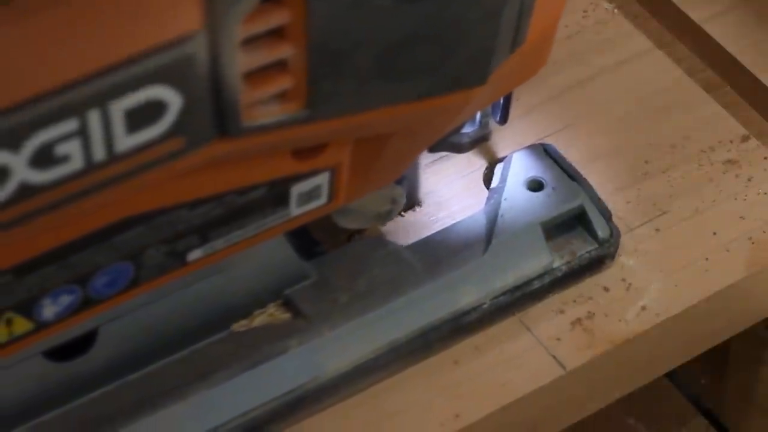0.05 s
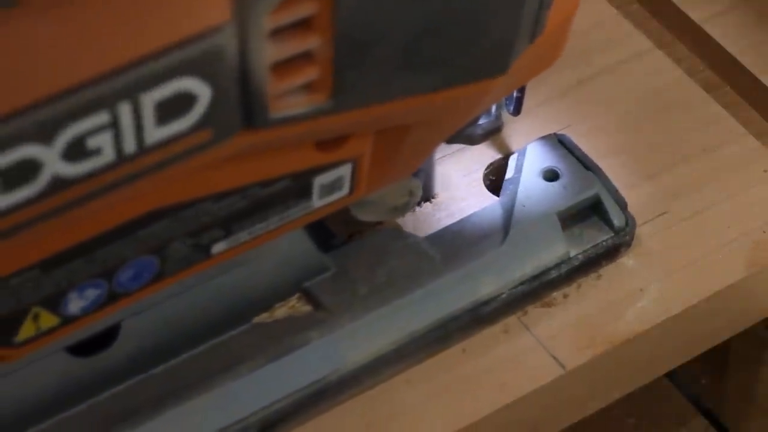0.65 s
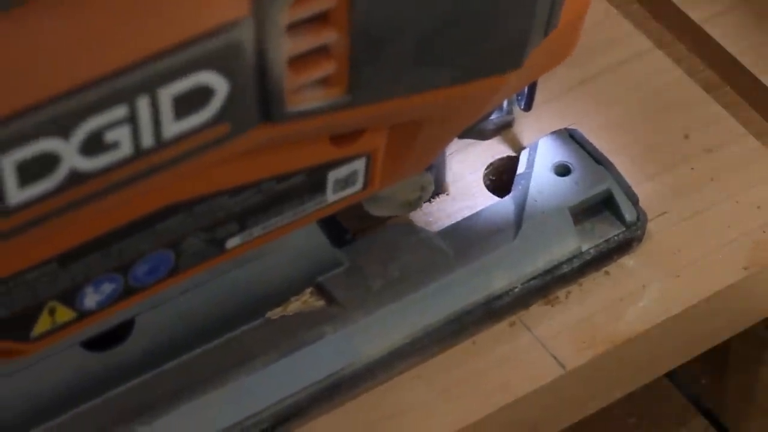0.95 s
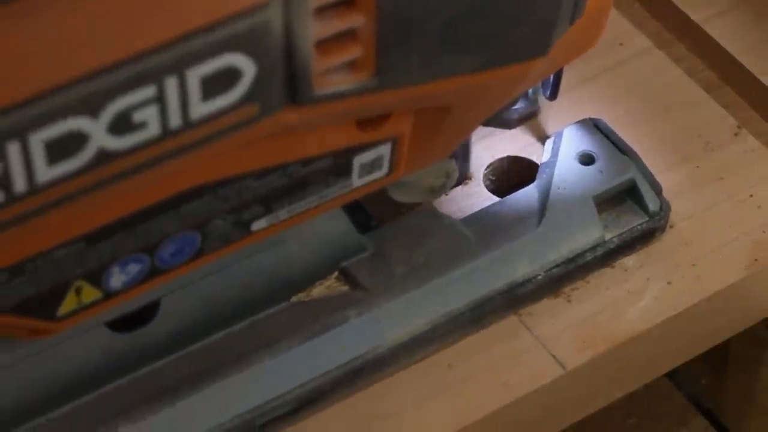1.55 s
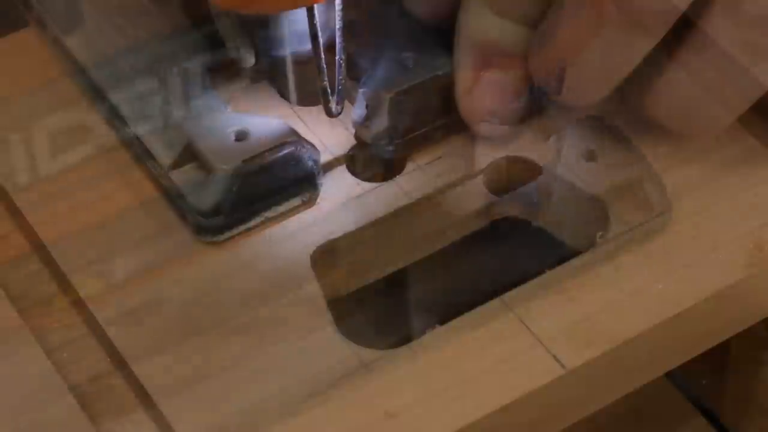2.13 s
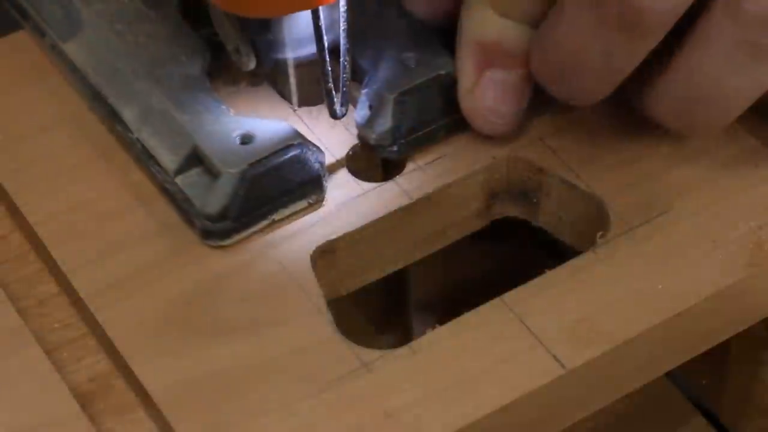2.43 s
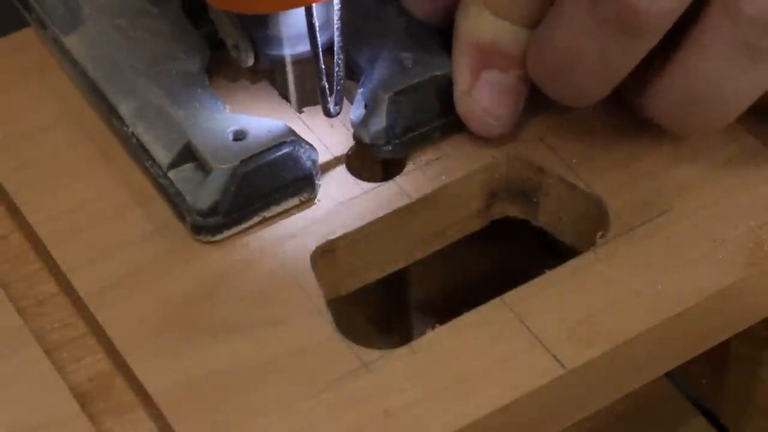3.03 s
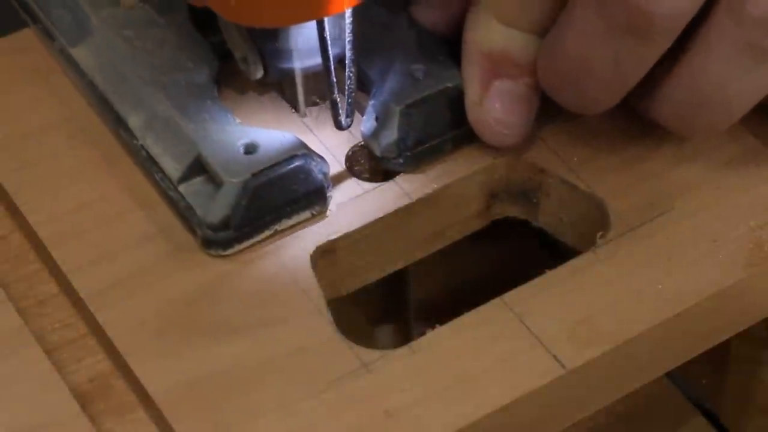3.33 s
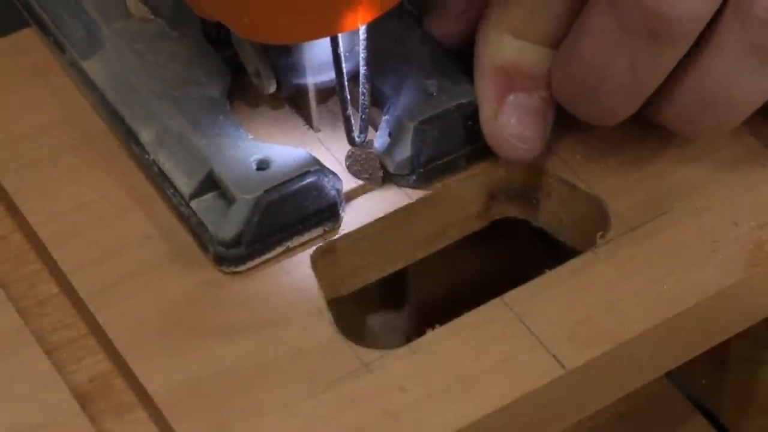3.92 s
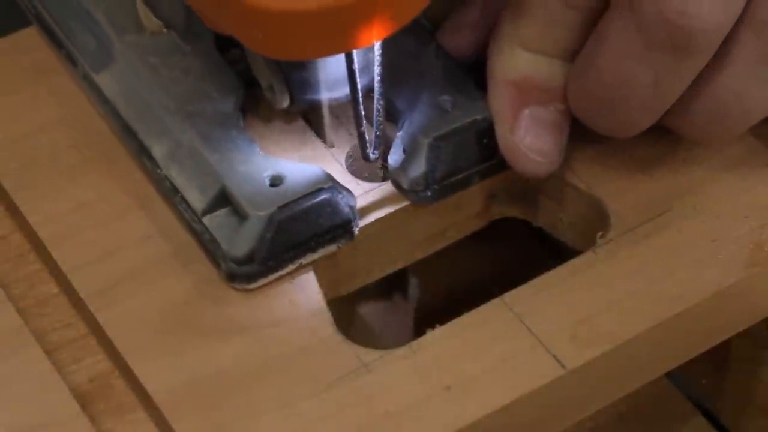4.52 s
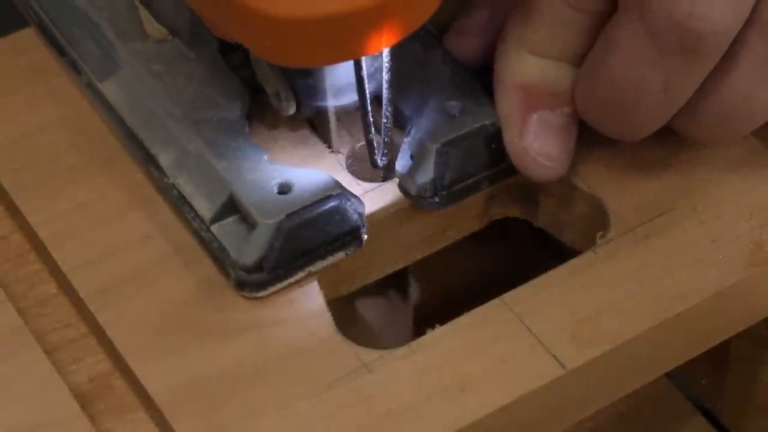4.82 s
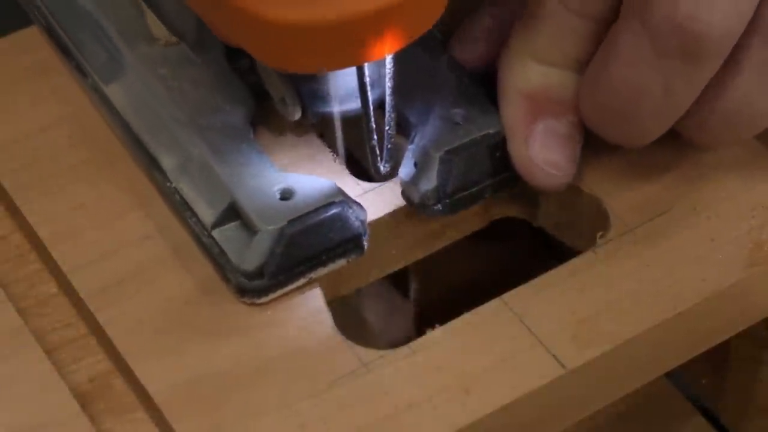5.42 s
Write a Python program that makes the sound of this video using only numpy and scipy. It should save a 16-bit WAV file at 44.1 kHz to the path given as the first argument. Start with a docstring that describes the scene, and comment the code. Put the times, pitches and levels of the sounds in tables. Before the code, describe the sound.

Close up in a workshop, a jigsaw runs without stopping, its blade rasping through a wooden board. The high motor whistle, whining gears and rapid rattle carry a hiss of air. One cut fades into another after roughly two seconds, and the pitch dips a little with each push into the wood, rising again as the pressure lets up. The saw turns slightly shriller at the end.

```python
"""At a workshop bench, close by, a corded jigsaw cuts a wooden board; one cut fades into a second near 2 s.
The motor fan whistles, the gears whine, the plunger rattles about 54 times a second
and the teeth rasp in the board. The motor sags when the blade bites and speeds up when it comes free.
A faint room rumble lies underneath."""
import sys
import numpy as np
from scipy import signal
from scipy.fft import rfft, irfft
from scipy.io import wavfile
from scipy.ndimage import uniform_filter1d

SR = 44100
rng = np.random.default_rng(int(sys.argv[2]) if len(sys.argv) > 2 else 0)


def dump_mix(stems):
    """Bounce the given channels to the path in sys.argv[1] as a 16-bit WAV at rate SR."""
    frames = np.atleast_2d(stems).T  # one column per channel
    limited = np.clip(frames, -1, 1)  # hard clip at full scale
    pcm = np.round(limited * 32767).astype(np.int16)
    wavfile.write(sys.argv[1], SR, pcm)


N = 245151
T = np.arange(N) / SR
GEAR_TEETH, PINION_TEETH, FAN_BLADES = 46, 7, 8


def undb(db):
    """Decibels to gain."""
    return 10 ** (np.asarray(db) / 20)


def unit(x):
    """Scale to rms 1."""
    return x / np.sqrt(np.mean(x ** 2))


def ramp(start, length):
    """Rises from 0 to 1 in `length` seconds."""
    return np.clip((T - start) / length, 0, 1)


def swell(start, end, edge):
    """1 from start to end, with a slope of `edge` seconds on either side."""
    return ramp(start - edge, edge) - ramp(end, edge)


def drift(rate_hz):
    """Smooth random movement up to about rate_hz, rms 1."""
    f = np.arange(N // 2 + 1) * SR / N
    return unit(irfft(rfft(rng.standard_normal(N)) / (1 + (f / rate_hz) ** 4), N))


def shape(x, gain_at):
    """Filter x with a response given as a function of frequency."""
    return irfft(rfft(x) * gain_at(np.arange(1, N // 2 + 2) * SR / N), N)


def ring(x, hz, width):
    """A resonance with steep skirts, rms 1."""
    return unit(shape(x, lambda f: (1 + 1j * (f / hz - hz / f) * hz / (1.3 * width)) ** -2))


def workshop_rumble(db=-104, corner_hz=110):
    """Faint low room tone."""
    lows = shape(rng.standard_normal(N), lambda f: np.minimum(f / 40, 1) / (1 + (f / corner_hz) ** 2))
    return undb(db) * unit(lows)


def bench_comb(f):
    """Short echoes off the bench and the things on it comb the spectrum finely."""
    # Each row: delay in ms, level in dB.
    echoes = [(3.1, -32), (5.3, -29.5), (8.9, -15)]
    return 1 + sum(undb(db) * np.exp(-2j * np.pi * f * ms / 1000) for ms, db in echoes)


def housing(f, cut):
    """The saw body colours the rattle and hiss; cut is 0 for the first, 1 for the second."""
    # The broad colour. Each row: frequency in Hz, level in dB in the first cut and in the second.
    colour = [(30, -121, -118), (100, -118, -117), (180, -110, -111), (315, -94.5, -99),
              (516, -87.5, -85.5), (1090, -81, -81), (1750, -81, -78), (2170, -85, -87), (2500, -78.5, -77),
              (3240, -79, -77.5), (4100, -84, -78.5), (5180, -81, -77), (6040, -88.5, -83),
              (7110, -81, -82), (7840, -96, -91.5), (8470, -88, -86.5), (10970, -94, -89.5),
              (12400, -99, -94), (17000, -101, -101)]
    # Resonances and hollows. Each row: centre and width in Hz, gain in dB in the first and second cut.
    bumps = [(3080, 63, 4, -3.5), (3314, 180, 1.5, 2), (4170, 440, 1.5, 2), (4566, 246, -0.5, -7),
             (4670, 42, 6, 6), (6480, 160, -2, -10)]
    hz, *colour_db = np.transpose(colour)
    bumps_db = sum(db[cut] * np.exp(-(2 * (f - centre) / width) ** 2) for centre, width, *db in bumps)
    return undb(np.interp(np.log(f), np.log(hz), colour_db[cut]) + bumps_db)


def knocks(strokes, slop_ms, scatter_db, per_stroke, memory_strokes=36, max_strokes=320):
    """Small impacts at the same places in every stroke, each a little early or late, hard or soft."""
    place = np.arange(max_strokes)[:, None] + (np.arange(per_stroke) + rng.random(per_stroke)) / per_stroke
    late, force, contact = rng.standard_normal((3, max_strokes, per_stroke))
    hit_s = np.interp(place, strokes, T, right=-1) + late * slop_ms / 1000
    at = np.rint(hit_s * SR).astype(int)
    # the pattern changes slowly as the saw creeps forward
    pattern = uniform_filter1d(contact, memory_strokes, axis=0, mode="wrap")
    size = pattern * undb(scatter_db * force)
    inside = (at > 0) & (at < N)
    return unit(np.bincount(at[inside], size[inside], N))


def rattle_and_hiss(strokes, low_hz=700, high_hz=3400):
    """Plunger knocks fill the mids; rushing air and flying dust take over in the treble."""
    def knock_share(f):
        """Part of the power that comes from the knocks."""
        return .8 / (1 + (f / high_hz) ** 2) / (1 + (low_hz / f) ** 2)
    plunger = knocks(strokes, slop_ms=.025, scatter_db=2.5, per_stroke=90)
    rattle = shape(plunger, lambda f: np.sqrt(knock_share(f)))
    puffs_db = -0.05 * np.cos(2 * np.pi * 2 * strokes) + .5 * drift(56) + 0.54 * drift(5.1)
    air = shape(rng.standard_normal(N) * undb(puffs_db), lambda f: np.sqrt(1 - knock_share(f)))
    return shape(rattle + air, bench_comb) * np.sqrt(SR / 2)  # about 0 dB per Hz


def tooth_rasp(strokes, ring_db):
    """Teeth tear the fibres, hardest on the upstroke, and set the board ringing."""
    # The board's low and high resonance. Each row: centre in Hz, width in Hz, trim in dB.
    modes = [(1213, 340, -1), (1705, 293, -0.5)]
    teeth = knocks(strokes, slop_ms=0.073, scatter_db=4.5, per_stroke=30) + .5 * rng.standard_normal(N)
    upstroke_db = -np.cos(2 * np.pi * strokes)
    teeth = teeth * undb(upstroke_db)
    return sum(ring(teeth, hz, width) * undb(db + trim) for (hz, width, trim), db in zip(modes, ring_db))


def tooth_catches():
    """The teeth catch now and then and shift the level of the board's two rings, in dB."""
    # Each row: start and end in seconds, change of the low ring and of the high ring in dB.
    catches = [(0, 0.052, -3, 6), (1.3, 1.418, -6, 1), (1.998, 2.16, 6, 5.5), (2.557, 2.75, 2, -4),
               (3.85, 3.91, 4.5, 1), (4.541, 4.731, 4, 4), (5.3, 5.4, -4, 4.5)]
    return sum(np.outer(change_db, swell(start, end, 0.027)) for start, end, *change_db in catches)


def gear_whine(strokes, bite, mesh_db, tones, waver_db=1.88):
    """Harmonics of the stroke rate; biting shakes the board and presses the gear teeth together."""
    # Single tones sing out as the pressure on the shoe shifts.
    # Each row: start and end in seconds, harmonic number, level it moves to in dB.
    singing = [(0, .46, 36, -55), (0, .46, 46, -52), (.52, .63, 16, -58), (.75, 1, 19, -60),
               (1.05, 1.3, 16, -58), (1.05, 1.45, 9, -57), (1.1, 1.45, 26, -57), (2.2, 2.5, 13, -59),
               (2.62, 2.8, 46, -48.5), (2.86, 3.15, 9, -57), (4.55, 4.74, 21, -53), (4.55, 4.74, 33, -53),
               (4.75, 5.05, 20, -53), (4.78, 5.08, 46, -45.5), (5.2, 5.5, 9, -59), (5.2, 5.48, 22, -53)]
    whine = 0
    for multiple, biting_db, free_db in tones:
        harmonic = round(multiple)
        db = free_db + bite * (biting_db - free_db)
        for start, end, singer, sung_db in singing:
            if singer == harmonic:
                db = db + (sung_db - db) * swell(start, end, 0.036)
        if abs(harmonic - GEAR_TEETH) < 4:  # the mesh tone and its sidebands
            db = db + mesh_db
        slip = 0.22 * np.sqrt(harmonic / GEAR_TEETH) * drift(25)
        gain = undb(db + waver_db * drift(8.9))
        whine = whine + gain * np.sin(2 * np.pi * (harmonic * strokes + rng.random()) + slip)
    return np.sqrt(2) * whine


def gear_shrill(strokes, rough_rad=0.26, lag_rad=0.38):
    """Third harmonic of the gear mesh, loaded twice a stroke as the plunger turns round."""
    turn = 2 * np.pi * 2 * strokes
    mesh = np.sin(2 * np.pi * 3 * GEAR_TEETH * strokes - lag_rad * np.sin(turn) + rough_rad * drift(40))
    pressure = 1 + np.cos(turn + rough_rad * drift(13))
    return unit(mesh * pressure)


def fan_whistle(strokes, sag_hz, flutter_db=0.51, rough_rad=0.091):
    """Fan blades pass the vent ribs: one piercing tone that flutters in the draught."""
    # The whistle swells. Each row: start and end in seconds, lift in dB.
    swells = [(2.075, 2.256, 4.5), (4.2, 4.72, 1.5)]
    # It dips for an instant. Each row: time in seconds, depth from 0 to 1.
    stutters = [(.494, 0.4), (1.571, 0.4), (1.791, 0.7), (1.97, 0.7), (2.125, 0.6), (2.175, .75),
                (3.286, 0.61), (3.681, 0.83), (4.769, 0.91), (5.392, 0.46)]
    lift_db = sum(db * swell(start, end, 0.039) for start, end, db in swells)
    level_db = -43.5 + 0.0169 * sag_hz + lift_db  # a little louder as the motor sags
    dips = np.prod([1 - depth * np.exp(-((T - at) / .014) ** 2) for at, depth in stutters], axis=0)
    passes = strokes * GEAR_TEETH / PINION_TEETH * FAN_BLADES
    tone = np.sin(2 * np.pi * passes + rough_rad * drift(60))
    flutter = undb(flutter_db * drift(15))
    return unit(tone * flutter) * undb(level_db) * dips


def motor(free_fan_hz, pushes, wobble=.0008):
    """Each push drags the motor down until the hand lets go. Gives the stroke count and the fan's sag."""
    sag_hz = sum(hz * (1 - np.exp(-np.maximum(T - start, 0) / bite_s)) * (1 - ramp(end, let_go_s))
                 for start, end, hz, bite_s, let_go_s in pushes)
    stroke_hz = (free_fan_hz - sag_hz) / FAN_BLADES * PINION_TEETH / GEAR_TEETH
    strokes = np.cumsum(stroke_hz * (1 + wobble * drift(12))) / SR
    return strokes, sag_hz


def jigsaw(strokes, sag_hz, mix, tones, cut, touch_hz, bite_hz, labour_hz, whine_db):
    """One cut. The blade meets the wood at a sag of touch_hz, bites fully at bite_hz, labours at labour_hz."""
    bite = np.clip((sag_hz - touch_hz) / (bite_hz - touch_hz), 0, 1)
    strain = np.clip(sag_hz / labour_hz, 0, 1) ** 1.9  # grows steeply with the sag
    db = {layer: free + strain * (labouring - free) for layer, (free, labouring) in mix.items()}
    ring_db = np.array([db["low_ring"], db["high_ring"]]) + tooth_catches() + 0.26 * drift(11)
    mesh_db = db["gear"] + 0.7 * drift(2.8)
    shrill_db = db["shrill"] + 5 * ramp(5.3, .08)  # shriller once the blade is through
    whine = gear_whine(strokes, bite, mesh_db, tones) * undb(whine_db)
    shrill = gear_shrill(strokes) * undb(shrill_db)
    clatter = shape(rattle_and_hiss(strokes), lambda f: housing(f, cut)) * undb(db["hiss"])
    return whine + shrill + clatter + tooth_rasp(strokes, ring_db)


def scene(join_s=1.96, fade_out_s=0.057, fade_in_s=0.49):
    """Two cuts, the same in both ears; the second swells in under the first, its whistle last."""
    # The hand pushes the saw into the wood; overlapping pushes add. Each row: start and end in
    # seconds, sag of the fan tone in Hz, bite time and let-go time in seconds.
    pushes = [(-.11, 0.474, 106.6, 0.053, 0.046), (0.621, 2, 117, .04, .05), (1.001, 2, 16.7, 0.041, 0.048),
              (2.148, 2.352, 30.3, .1, 0.069), (2.51, 2.8, 55.4, 0.082, 0.058),
              (2.89, 3.041, 12.4, 0.044, 0.075), (3.139, 5.017, 68, .1, 0.29),
              (3.301, 4.76, 19.9, .3, 0.038), (5.309, 5.599, 37.5, 0.26, .1)]
    # Plunger and gear tones of each cut. Each row: multiple of the stroke rate (played at the nearest
    # whole number), level in dB with the blade biting, level in dB running free.
    first_tones = [(1, -104, -104), (2, -93, -100), (3, -79, -81), (4, -80, -98), (6, -61, -80),
                   (7, -65, -86), (9, -62, -66), (10, -80, -62), (16, -71, -64), (19, -69, -68),
                   (26, -61, -62), (29, -62, -81), (30, -61, -77), (31, -53, -72), (32, -64, -70),
                   (33, -62, -63), (34, -62, -68), (36, -58, -71), (44, -58, -55), (45, -64, -70),
                   (46, -54, -58), (48, -54, -68), (128, -68, -70)]
    second_tones = [(1, -97, -99), (2, -92, -92.5), (3, -99, -92), (4, -87, -86.5), (5, -75.5, -76.5),
                    (6, -72, -70.5), (7, -67, -68.5), (8, -79, -68.5), (9, -66, -60.5), (10, -70, -70),
                    (12, -69.5, -70), (13, -64, -67), (16, -68, -64.5), (20, -62.5, -65), (21, -59.5, -84),
                    (22, -65.5, -82), (23, -68, -83), (30, -55, -67), (32, -75, -63), (33, -61.5, -75),
                    (36, -65, -61), (43, -62, -64), (44, -47.5, -50), (45, -68, -66), (46, -48, -60),
                    (48, -54, -66), (86.6, -63, -78), (91.6, -60.5, -54), (94.2, -55.5, -60),
                    (122.3, -63, -61.5), (127.8, -56.5, -64)]
    # The mix of each cut. Each layer: gain in dB running free, gain in dB labouring.
    first_mix = dict(gear=(1, 1), low_ring=(-58, -64.5), high_ring=(-52.5, -50.5), hiss=(0.6, -0.5),
                 shrill=(-63, -54))
    second_mix = dict(gear=(4, -3.5), low_ring=(-61, -51), high_ring=(-54.5, -55), hiss=(-1.2, -1),
                  shrill=(-61.5, -68))
    first_run = motor(free_fan_hz=2940, pushes=[push for push in pushes if push[0] < join_s])
    second_run = motor(free_fan_hz=2977, pushes=[push for push in pushes if push[0] >= join_s])
    first = jigsaw(*first_run, first_mix, first_tones, cut=0,
                   touch_hz=55.7, bite_hz=114, labour_hz=129, whine_db=-0.35)
    second = jigsaw(*second_run, second_mix, second_tones, cut=1,
                    touch_hz=28, bite_hz=63.6, labour_hz=88.6, whine_db=-0.45)
    fade_out = 1 - ramp(join_s - fade_out_s / 2, fade_out_s)
    fade_in = ramp(join_s + fade_out_s - fade_in_s, fade_in_s) ** 2
    first = (first + fan_whistle(*first_run)) * fade_out
    second = (second + fan_whistle(*second_run) * fade_in) * fade_in
    return np.tile(first + second + workshop_rumble(), (2, 1))


def record(dry, top_hz=15700):
    """A steep low-pass takes off the very top."""
    return signal.sosfilt(signal.ellip(10, .2, 80, top_hz, fs=SR, output="sos"), dry)


dry = scene()
out = record(dry)
dump_mix(out)
```